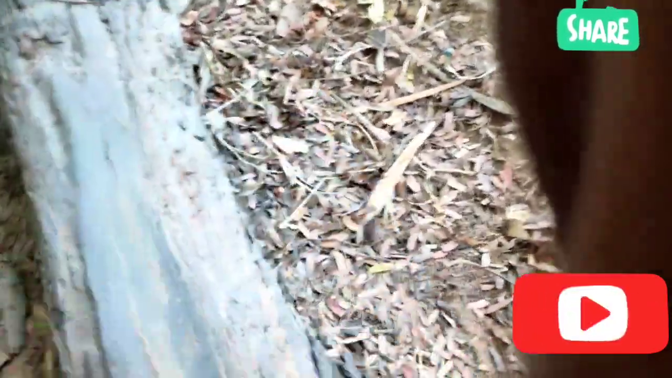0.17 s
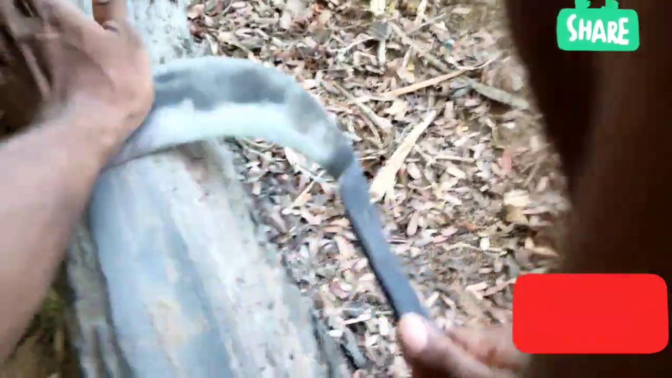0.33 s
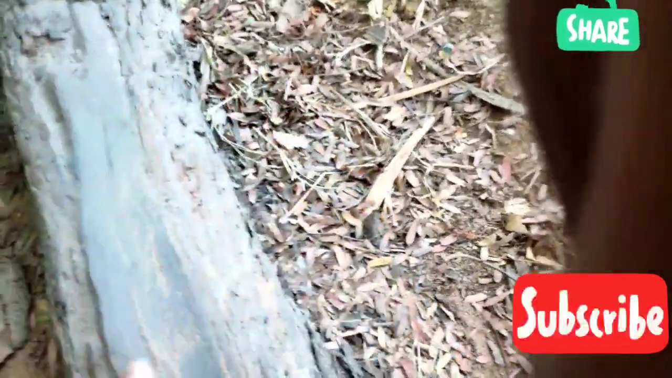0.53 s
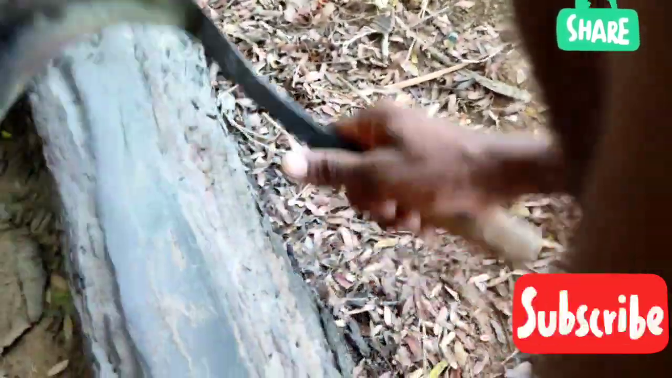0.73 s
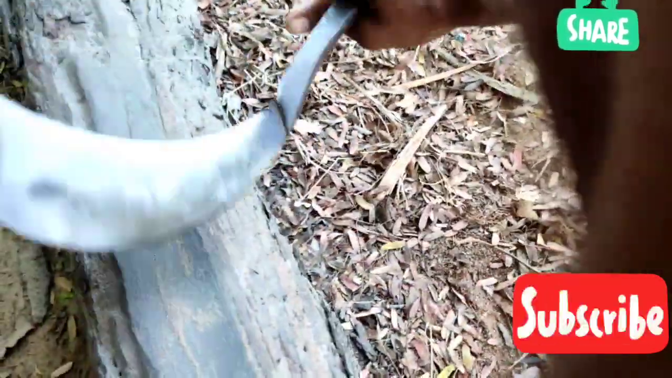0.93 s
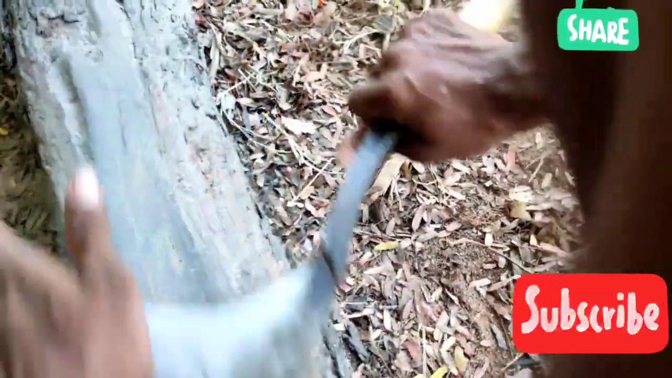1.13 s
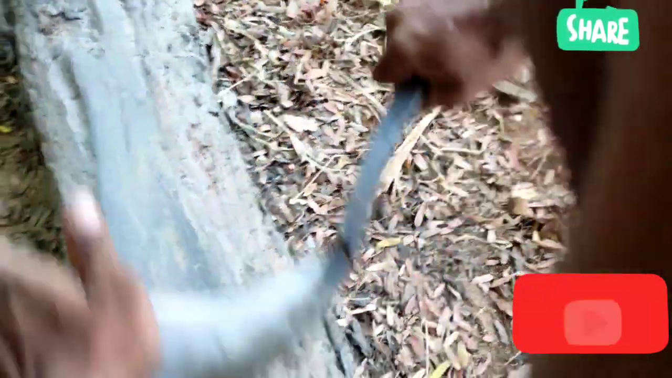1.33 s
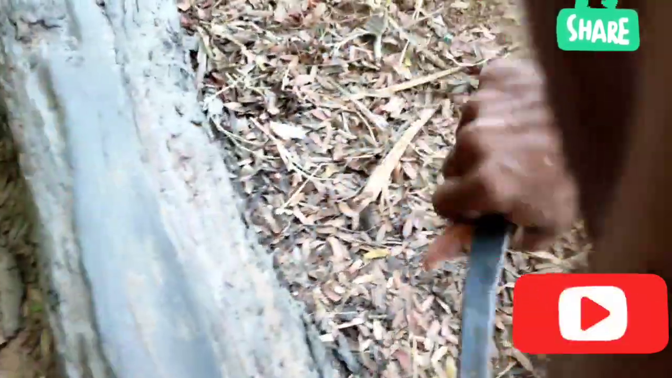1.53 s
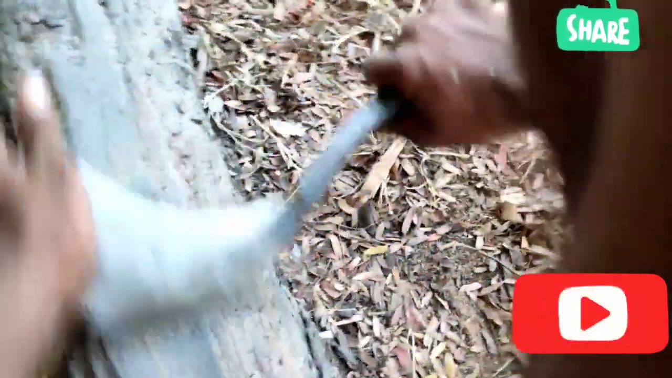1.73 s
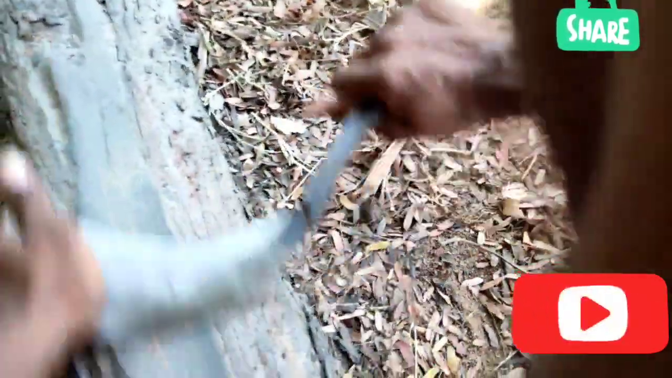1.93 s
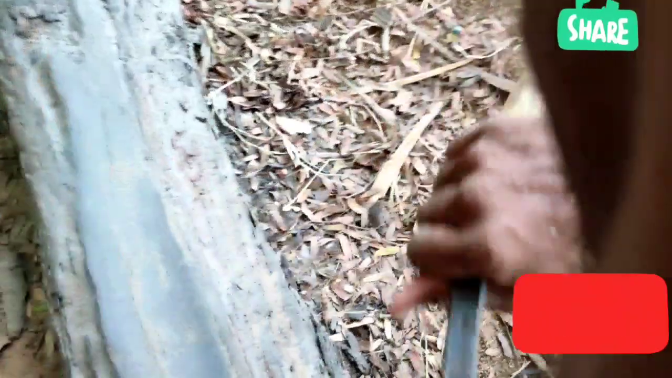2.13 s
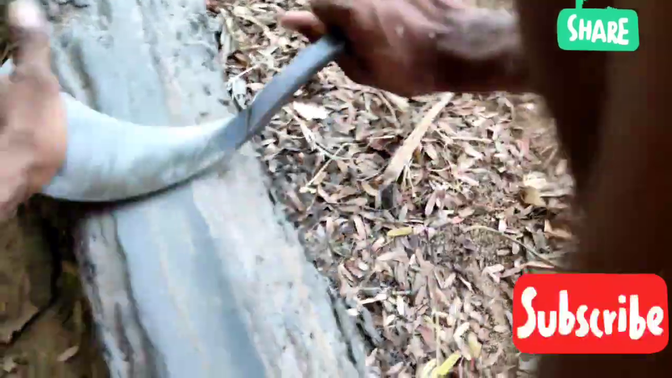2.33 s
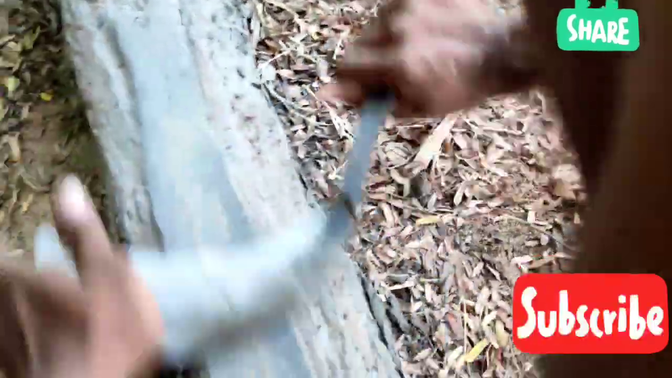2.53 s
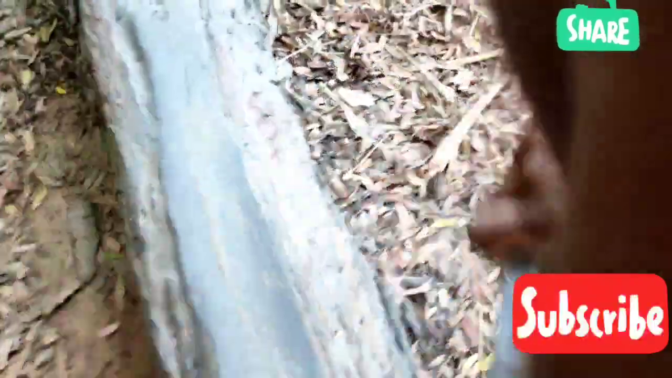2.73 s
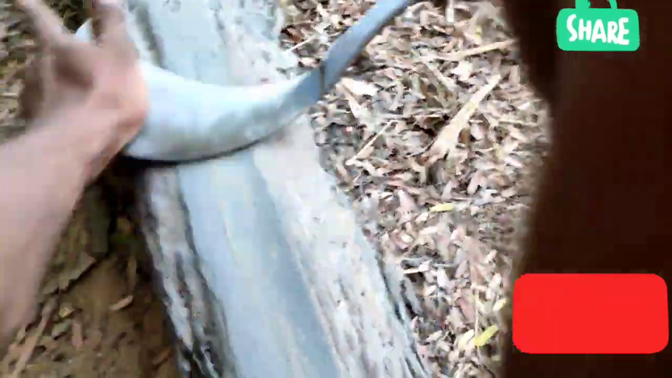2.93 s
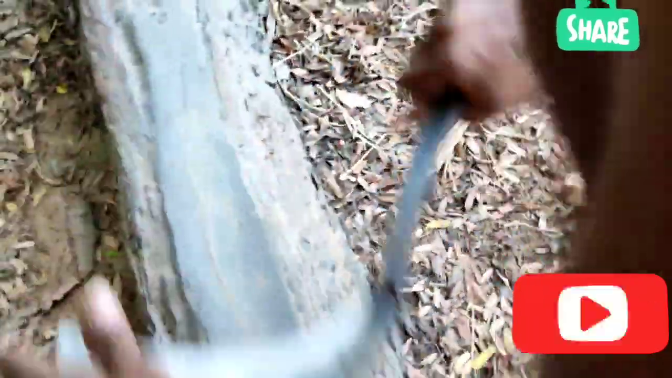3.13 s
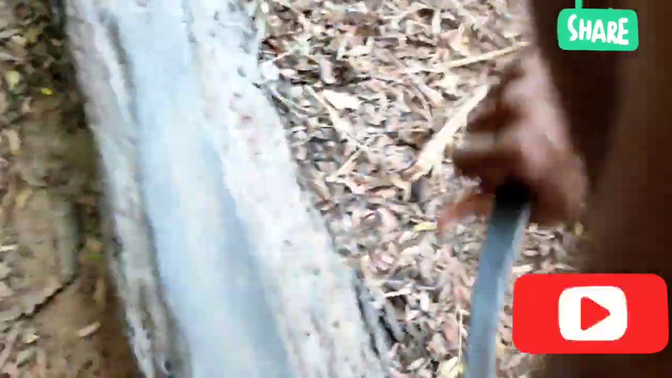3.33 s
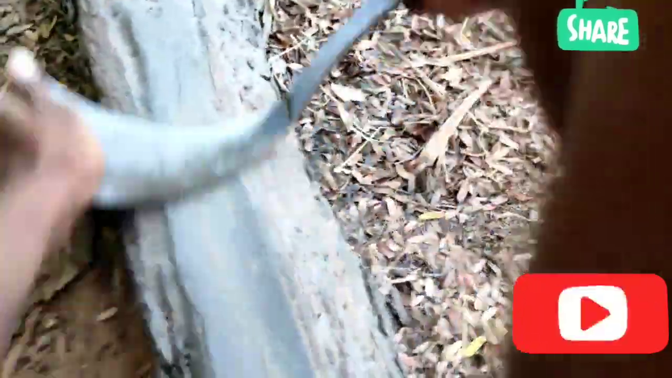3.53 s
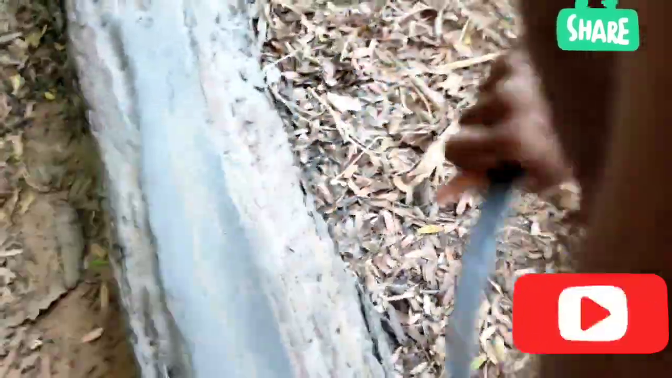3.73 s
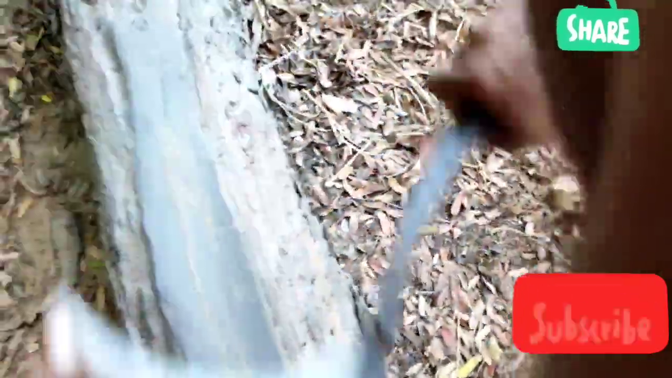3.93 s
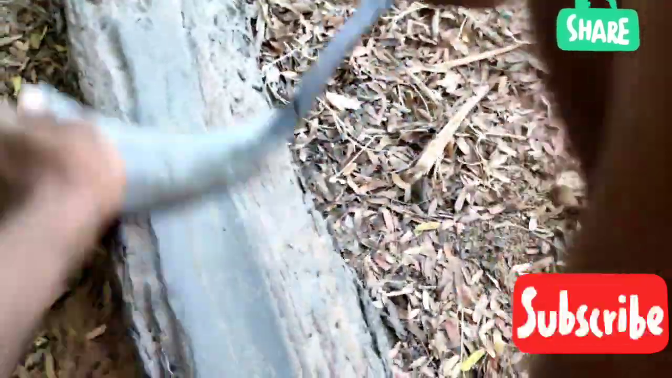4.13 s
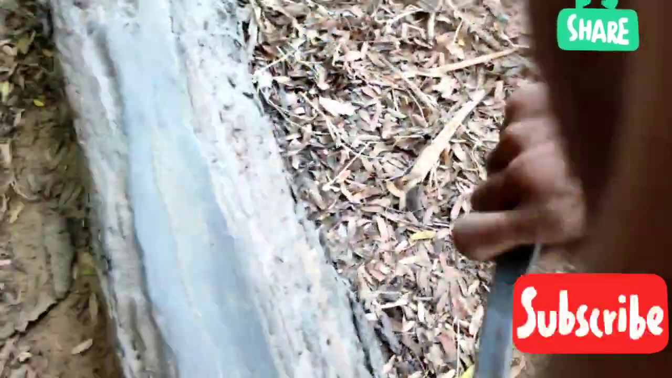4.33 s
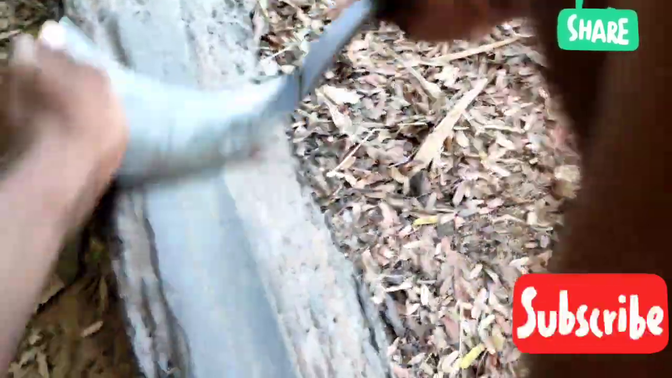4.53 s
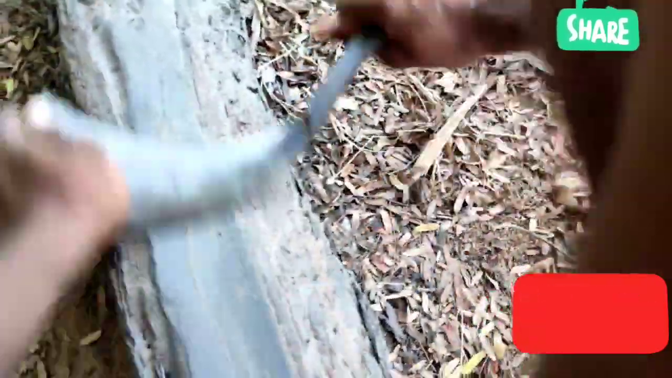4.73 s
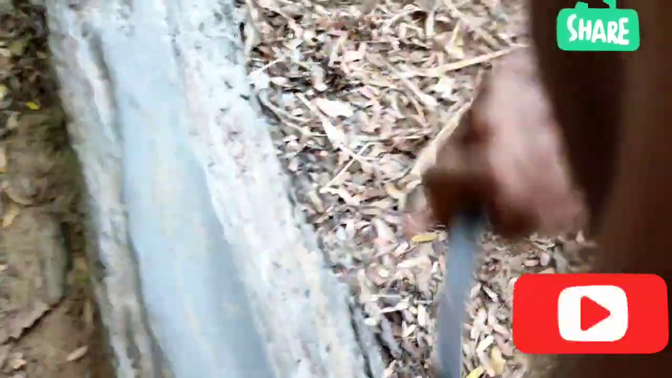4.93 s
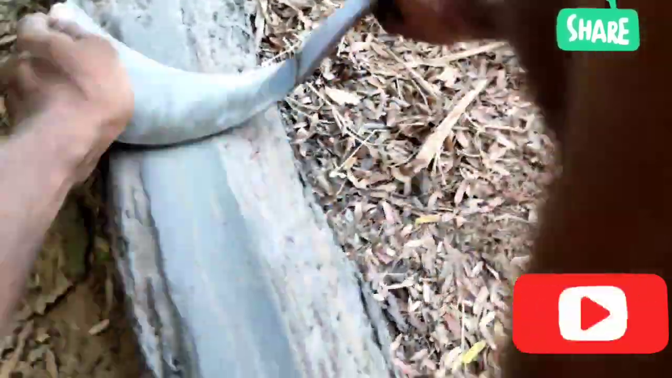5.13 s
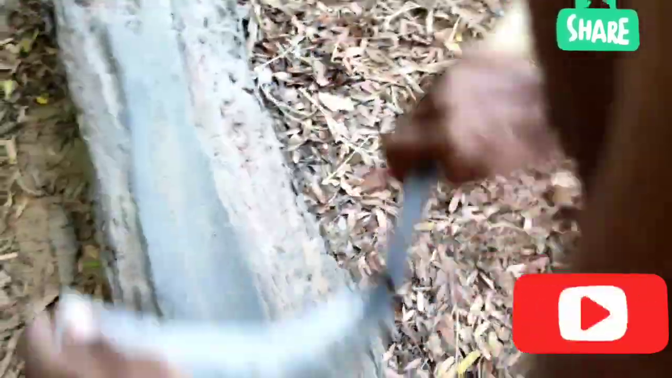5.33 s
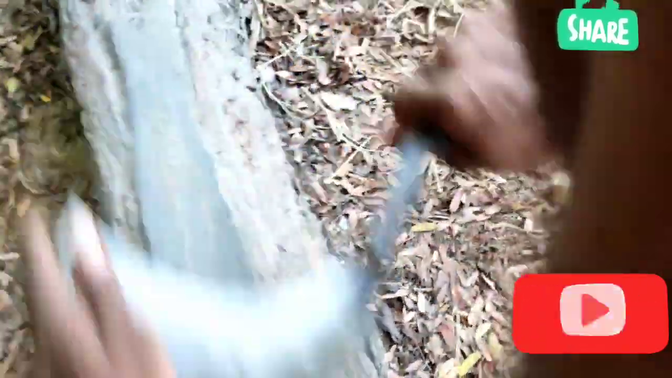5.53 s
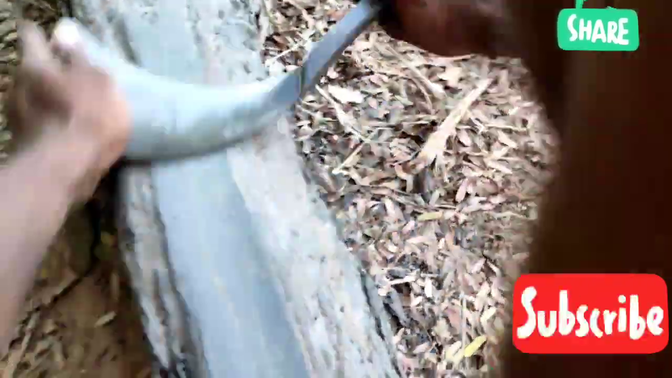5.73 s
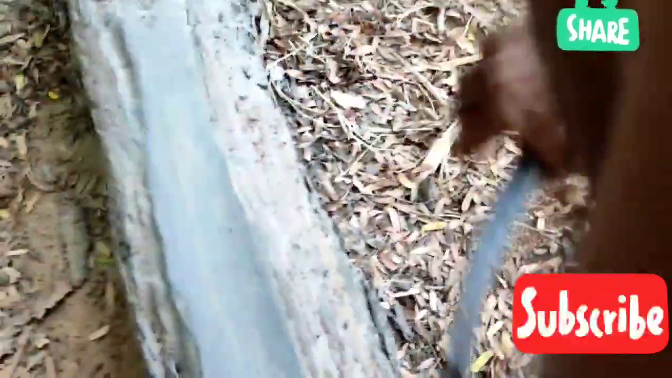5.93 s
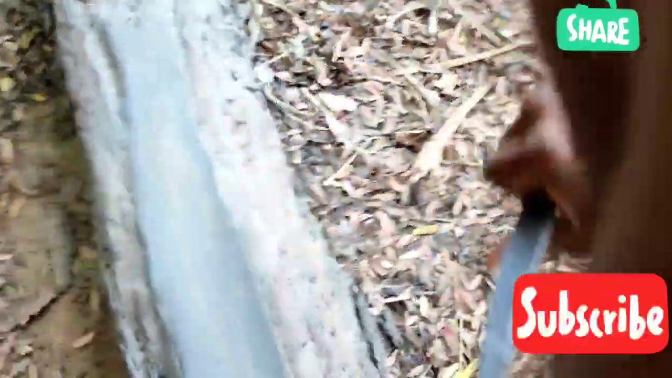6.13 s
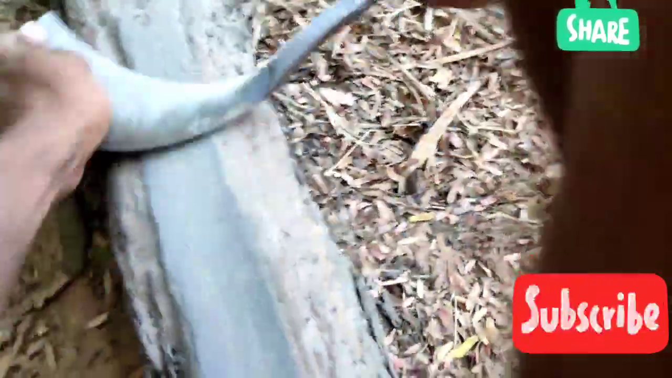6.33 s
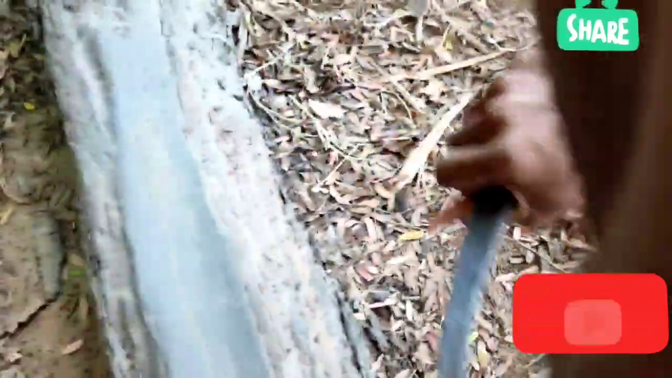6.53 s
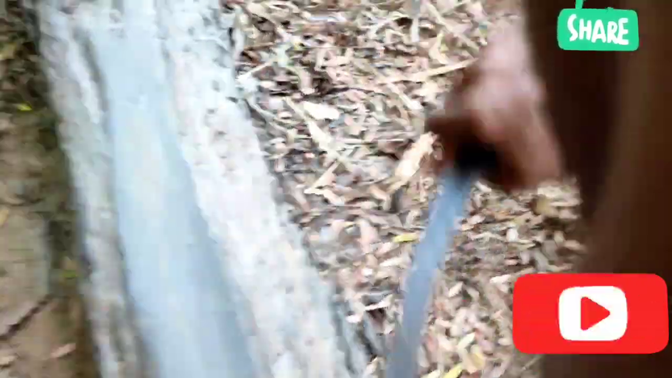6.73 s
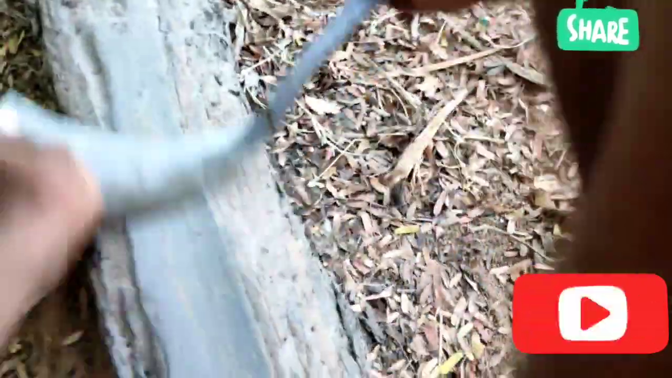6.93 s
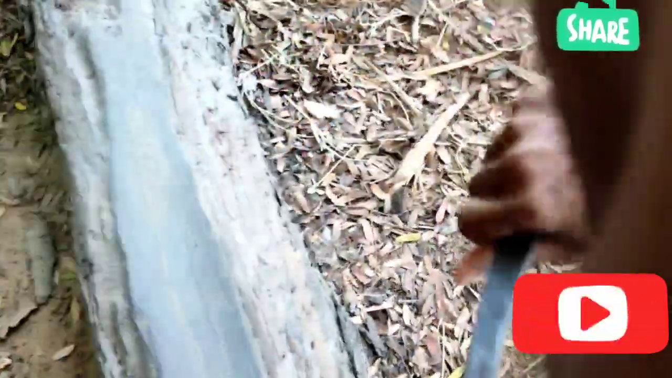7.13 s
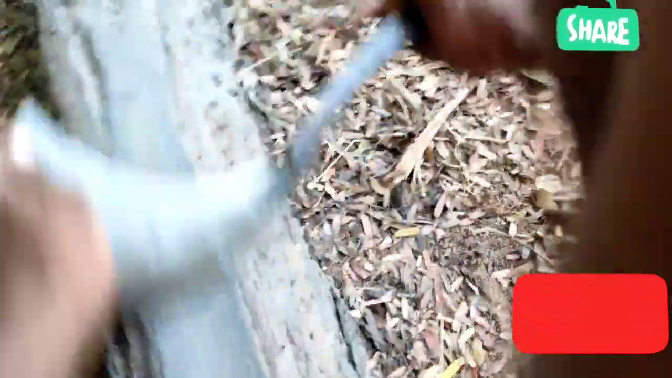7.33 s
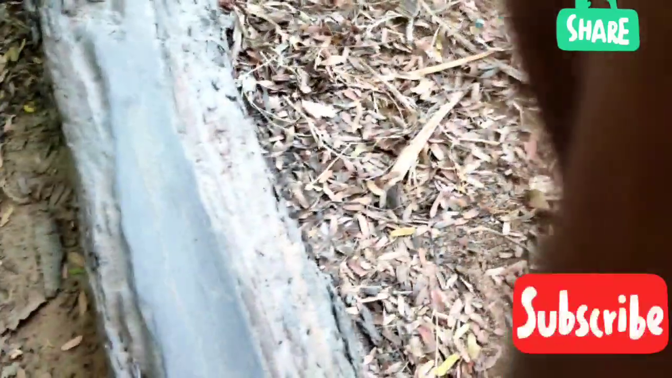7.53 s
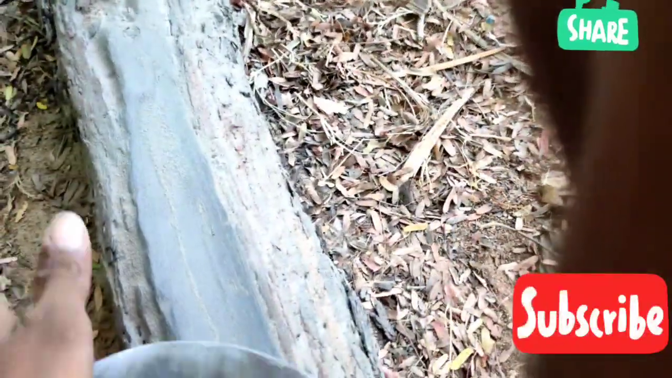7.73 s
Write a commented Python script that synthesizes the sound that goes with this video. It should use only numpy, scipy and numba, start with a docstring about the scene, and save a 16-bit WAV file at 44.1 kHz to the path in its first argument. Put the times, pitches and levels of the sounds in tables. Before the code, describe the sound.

A curved steel blade is scraped by hand over grit on a log, very close to a stereo microphone outdoors. From 0 to 0.7 s come several quick, fairly dull rasping strokes, each about 0.15 s long. At 0.73 s a sharp metallic knock marks the lift; a soft airy swish follows from 0.8 to 1.1 s, ending in two small clacks as the blade is set down around 1.07 s. From 1.1 s the rubbing resumes on the other face, brighter and harsher, at about six and a half strokes a second, with gritty crunch, short damped steel resonances and alternating tone. Low wind rumble grows after 2.7 s, with puffs and thumps mostly on the left, strong near 3.3, 3.8 and 7.3 s. The last stroke fades by 7.54 s; a faint swish follows around 7.7 s over wind and slight hiss.

```python
"""Outdoors, beside a log: a curved steel blade is rubbed to and fro over grit, close to a two-port microphone.
Irregular grain bites excite damped modes of the blade, while crushed grit and the log sound directly.
The blade is lifted, swung round and set down with knocks, then rubbed again and lifted at the end; the swings
are bands of air noise. Wind turbulence buffets each port separately over a faint, steady hiss of shaped noise."""
import sys
import numpy as np
from scipy import signal
from scipy.fft import rfft, irfft, next_fast_len
from scipy.io import wavfile
from scipy.ndimage import uniform_filter1d
from numba import njit

SR = 44100
rng = np.random.default_rng(int(sys.argv[2]) if len(sys.argv) > 2 else 0)


def inscribe(sig):
    """Save sig as 16-bit PCM at rate SR to the path in sys.argv[1].

    A 1-D sig is mono; a 2-D sig holds one channel per row.
    Samples are clipped to [-1, 1] before scaling.
    """
    pcm = np.round(np.clip(np.atleast_2d(sig).T, -1, 1) * 32767)
    wavfile.write(sys.argv[1], SR, pcm.astype(np.int16))


N = 342657
STEP = 32  # samples between control values
T = np.arange(N // STEP + 1) * STEP / SR  # control times, s

# Spectrum of the outdoor hiss: frequency_hz, relative_density_db
HISS_SPECTRUM = [(200, -23), (600, 1.5), (2000, -12), (6000, -19), (9000, -11.5), (14000, -24)]
HISS_DB = -51  # rms level
# Wind at the ports: time_s, relative_level_db, left_minus_right_db
WIND_LEVELS = [(0.0, -54, 7), (0.6, -48.0, -3), (1.2, -41.5, -3.5), (1.8, -46.5, 9), (2.3, -42, -3),
               (2.7, -39.5, -11), (3.1, -28.5, 7.0), (3.5, -26.5, 15), (3.9, -31, 7), (4.3, -32, 7),
               (4.8, -33.0, 6), (5.3, -30.5, 1), (5.9, -34.5, 11), (6.4, -28.5, 10), (6.9, -32.5, 5.5),
               (7.3, -27.5, 6.5), (7.77, -27, 0)]
# Spectrum of wind turbulence: frequency_hz, relative_density_db
WIND_SPECTRUM = [(15, -41), (25, -1.5), (70, 0.5), (98, 1.5), (249, -4.5), (364, -11), (545, -20.5),
                 (700, -35), (910, -28), (1540, -120)]
# Strongest puffs: time_s, peak_db, width_ms (between the points 6 dB down), port (0 left, 1 right)
GUSTS = [(1.84, -28, 99, 0), (2.36, -25.5, 170, 0), (2.75, -18, 56, 1), (3.06, -22, 89, 1),
         (3.28, -14.5, 93, 0), (3.43, -19, 64, 1), (3.64, -22, 72.0, 1), (3.76, -18, 38, 1),
         (3.82, -14.5, 75, 0), (3.98, -18.5, 85, 1), (4.06, -17.5, 78, 0), (4.31, -20, 77, 0),
         (4.32, -27.0, 96, 1), (4.83, -20, 120, 0), (5.71, -20, 51, 1), (6.37, -25, 56.0, 0),
         (6.91, -20.5, 49, 0), (7.12, -18.5, 62, 1), (7.32, -11.5, 42, 0), (7.66, -17.5, 35, 1)]
PUFF_DB, PUFFS_PER_S = (4, 5.5), 13  # spread at the left and right port; rate of new puff levels
# Blade and arm swept through the air: time_s, level_db, centre_hz
SWISHES = [(0.768, -85, 890), (0.81, -34, 960), (0.862, -42.5, 1900), (0.92, -42, 1960), (1.0, -44.5, 1750),
           (1.07, -46, 1500), (1.1, -44, 1520), (7.58, -95, 2110), (7.64, -50, 2200), (7.68, -45.5, 2220),
           (7.77, -51, 2280)]
# Blade knocks on the log: time_s, relative_level_db, contact_ms, ring_share (0-1)
KNOCKS = [(0.73, -10, 0.015, 0.89), (1.07, -21.5, 0.14, 0.51), (1.088, -12, 0.022, 0.89)]
# Blade off the log, first coming down again on its other face: start_s, end_s
LIFTS = [(0.774, 1.1), (7.54, 7.8)]
# Rubbing strokes: start_s, turn_db, attack_ms, early_db (once moving), slack_db (drop at mid-stroke),
# late_db (before slowing), release_ms, brightness_db (treble against bass)
STROKES = [(-0.07, -51, 112, -6.5, 11, -15, 54, -2.5), (0.096, -40, 87, -13, 5, -16, 43, -12),
           (0.254, -45, 48, -18.5, -5, -13.5, 50, -8), (0.425, -41, 43, -17.5, 0.0, -15, 33, -9.5),
           (0.572, -51, 88, -11, 3, -22, 67, -5), (1.121, -36.5, 115, -12, -4, -10.5, 52, 4.5),
           (1.306, -48, 46, -9, -2.5, -13, 38, -1.5), (1.458, -37, 52, -9.5, 2.5, -9.5, 53, 5),
           (1.605, -44, 37, -11.5, 1.5, -11.5, 47, 2), (1.758, -45, 62, -7.5, -1, -12, 45.5, 3),
           (1.9, -44.5, 45, -9, 6.5, -9, 53, 1.0), (2.057, -41.5, 67.0, -10, 5.5, -10, 59, 4.5),
           (2.218, -46, 26, -16, -3, -12.5, 58, 2.5), (2.376, -38.5, 51, -11, 3.5, -13, 38, 6),
           (2.527, -51, 65, -9.5, 2, -10, 78, 3), (2.684, -31.5, 67, -13.5, 10.5, -10.5, 80, 3),
           (2.851, -33.5, 45, -14, -4, -14, 52, 5.5), (3.004, -31.5, 59, -11, 3.0, -13, 94, 4.5),
           (3.157, -44, 71, -11, 0.0, -14, 51.0, 6.5), (3.306, -35, 33, -10.0, 5.5, -11.5, 59, 7),
           (3.457, -47, 75.0, -12.5, 0.0, -14.5, 47.0, 8), (3.629, -34.0, 48, -10, 8.5, -11.5, 63.0, 6.5),
           (3.78, -47, 44, -14, -1.5, -11.5, 64, 4), (3.936, -33.5, 34, -12.5, 5.0, -12, 60, 8.5),
           (4.087, -53, 60, -14.5, -2.5, -13.5, 53, 7.5), (4.243, -25, 68, -9.5, -1, -16.5, 59.0, 5.5),
           (4.398, -51.5, 79, -10, 4, -12.5, 66, 4.5), (4.571, -31, 42, -10.5, -1, -14.5, 56, 7),
           (4.712, -50, 88, -9.5, 5, -6.5, 49, 3), (4.873, -32, 61, -7, 4, -11, 54, 5),
           (5.024, -50.5, 74, -9, 1.5, -10.5, 45, 2.5), (5.178, -32, 58, -8, 9.0, -14, 57, 2),
           (5.333, -47, 51, -12.5, 0.0, -10.5, 32, 4.5), (5.492, -34.5, 58, -9, 3, -14, 48, 5.5),
           (5.643, -49, 56, -13, 2, -10, 40, 2), (5.8, -35.5, 52, -10.5, 5.5, -13, 47, 3.5),
           (5.958, -48, 49, -10.5, 4.0, -16.5, 21, 4), (6.119, -40, 31, -6.5, 5.5, -13.5, 63, 6.5),
           (6.269, -38, 70, -11, 4.5, -8.5, 37, 8), (6.423, -33, 43.0, -11.5, 7.5, -12, 55.0, 5.5),
           (6.571, -51, 53, -12.5, 2, -11, 38, 7.5), (6.731, -30.0, 41, -9.5, 11, -16, 47.0, 5.5),
           (6.888, -51, 57, -10, 7, -9, 46, 6.5), (7.034, -29, 58, -6.5, 11.5, -10.5, 58, 3),
           (7.192, -52, 69, -10.5, 3.5, -10, 37, 5.5), (7.346, -34.0, 58, -10.5, 8, -14.5, 120, 10)]
LIFTED_DB = -63.5  # level as the edge leaves the log
# First face, second face: treble lost at both turns; treble change from the near to the far end (the first face
# grows duller, the second brighter)
ARCH_DB, FAR_BRIGHT_DB = (12, 13.5), (-11, 11)
# Crushed grit, coarse to fine: centre_hz, relative_level_db
GRIT_SIZES = [(500, -61), (1000, -45), (2000, -23), (3500, -17.5), (6000, -16.5), (9000, -57), (12500, -32)]
# Blade modes: frequency_hz, width_hz (pressed down), left_db, right_db (both relative),
# far_db (gained from the near to the far end), face_db (weight of the change on the first face)
BLADE_MODES = [(806, 51, -42, -13, 1, 7), (1226, 90, -8.5, -5, 9, 6.5), (1470, 43, -8.5, -4, -7.5, -4),
               (1900, 150, -3.5, -18, -3, -4), (2350, 133, -9, -6.5, -9, -0.5),
               (2610, 152, -2, -9, 5.5, -14), (2972, 156, -3, -10.5, 16, -9),
               (3286, 180, 1.5, -3.5, 4, -25), (3580, 236, -12.5, -15.5, 8, 18.5),
               (4273, 206, -9, -6, -10, 7.5), (4675, 210, -5, -2.5, -3.5, -6),
               (5100, 22, -21, -4, -3.5, 19.5), (5550, 340, -22.5, -5, 7, -6),
               (6190, 410, -16, -5.5, 3, -13), (6730, 168, -9.5, -4, -3, 13),
               (7116, 124, -23, 1.5, -2, -10), (8370, 330, -11.5, -36, 27.5, 8.5),
               (9580, 58, -9.5, -26.5, 4, -16), (11100, 360, -19, -19, -7, -6)]
PORT_LAG_MS, LAG_SWING_MS = 0.3226, 0.068  # mean delay of the left port and its random spread
TOP_HZ = 15100  # stop-band edge of the microphone


def undb(db):
    """Level law: an amplitude ratio is ten to the power of decibels over twenty."""
    return 10 ** (np.asarray(db) / 20)


def gain(db):
    """Amplitude modulation: control-rate decibels become a gain for every sample."""
    return np.interp(np.arange(N), np.arange(len(T)) * STEP, undb(db))


def unit(x):
    """Power normalisation: scale to rms 1."""
    return x / np.sqrt(np.mean(x ** 2))


def walk(rate):
    """Low-pass random process: levels held for 1 / rate seconds, slewed twice, with spread near 1."""
    k = max(int(SR / STEP / rate), 1)
    held = np.repeat(rng.standard_normal(len(T) // k + 1), k)
    return 1.467 * uniform_filter1d(uniform_filter1d(held, k), k)[:len(T)]


def colour(x, hz, db):
    """Spectral shaping: weight a noise by a curve drawn on a log-frequency axis."""
    n = next_fast_len(N + SR // 2)
    f = np.maximum(np.fft.rfftfreq(n, 1 / SR), 1)
    curve_db = np.interp(np.log(f), np.log(hz), db)
    return irfft(rfft(x, n) * undb(curve_db), n)[:N]


@njit
def resonate(x, g, k, scale):
    """State-variable band-pass: two integrators whose tuning g and damping k change every 32 samples."""
    y, band, low = np.empty(len(x)), 0., 0.
    for i in range(len(x)):
        j = i >> 5
        v = (band + g[j] * (x[i] - low)) / (1 + g[j] * (g[j] + k[j]))
        band = 2 * v - band
        low = low + 2 * g[j] * v
        y[i] = scale * v
    return y


def resonance(x, hz, width, damping=1):
    """Damped resonance: gain near 1 at full damping; less damping lets it ring on."""
    hz = hz + 0 * T
    return resonate(x, np.tan(np.pi * hz / SR), damping * width / hz, width / hz.mean())


def twice(x, hz, width):
    """Cascaded resonance: two equal band-passes give steeper skirts."""
    return resonance(resonance(x, hz, width), hz, width)


def outdoors():
    """Diffuse field: a faint steady hiss, partly common to both ports."""
    mid = rng.standard_normal(N)
    ports = []
    for _ in range(2):
        hiss = colour(0.58 * mid + rng.standard_normal(N), *np.transpose(HISS_SPECTRUM))
        ports.append(undb(HISS_DB) * unit(hiss))
    return np.array(ports)


def wind():
    """Local turbulence: uneven eddies press and pop on each port alone, in quick lumps and slower puffs."""
    s, db, pan_db = np.transpose(WIND_LEVELS)
    spectrum = np.transpose(WIND_SPECTRUM)
    out = []
    for port, sign in enumerate((-1, 1)):
        pop_db = np.minimum(2.9 * rng.exponential(size=N), 11)
        pops = sign * (rng.random(N) < 90 / SR) * undb(pop_db)  # 90 a second on average
        lumps = rng.standard_normal(N) * gain(4.4 * walk(60) + 0.85 * walk(9.4))
        turbulence = unit(colour(lumps, *spectrum)) + .5 * unit(colour(pops, *spectrum))
        port_db = np.interp(T, s, db - sign * pan_db / 2) + PUFF_DB[port] * walk(PUFFS_PER_S)
        for at, peak_db, width_ms, side in GUSTS:
            if round(side) == port:
                port_db = np.maximum(port_db, peak_db - 6 * ((T - at) / (width_ms / 2000)) ** 2)
        out.append(turbulence * gain(port_db) / np.sqrt(2))
    return np.array(out)


def swish():
    """Aerodynamic noise: bands of turbulence round the swung blade move in level and pitch."""
    s, db, hz = np.transpose(SWISHES)
    air = rng.standard_normal((3, N))  # one part common to the ports, one for each
    centre = np.interp(T, s, hz)
    band = [unit(twice(air[0] + 1.06 * air[c], centre, 1700)) for c in (1, 2)]
    return np.array(band) * gain(np.interp(T, s, db) + 1.1 * walk(40))


def knocks():
    """Impulsive excitation: each contact push divides between ringing the blade and thudding in the log."""
    ring, thud = np.zeros(N), np.zeros(N)
    n = int(0.037 * SR)
    t = np.arange(n) / SR
    for s, db, contact_ms, share in KNOCKS:
        i = int(s * SR)
        push = np.exp(-(t / (contact_ms / 1000)) ** 2)
        # grains settle under the edge in a decaying rattle
        push += 0.53 * rng.standard_normal(n) * np.exp(-t / 0.0094) * share
        ring[i:i + n] += share * undb(db) * push
        thud[i:i + n] += (1 - share) * undb(db) * push
    return ring, thud


def strokes():
    """Reciprocating friction: each stroke swells, may slacken midway, and fades into the next turn."""
    travel, db, bright_db = np.zeros(len(T)), np.full(len(T), -85.), np.zeros(len(T))
    far = 1.  # starting end of the stroke: 1 far, 0 near
    turns = [row[:2] for row in STROKES[1:]] + [(np.inf, 0)]
    for row, (stop, end_db) in zip(STROKES, turns):
        s, turn_db, attack_ms, early_db, slack_db, late_db, release_ms, tone_db = row
        lift = min(a for a, b in LIFTS if a > s)
        lifts, face = lift < stop, int(s > LIFTS[0][0])
        if lifts:
            stop, end_db = lift, LIFTED_DB
        now = (T >= s) & (T < stop)
        ms, length = 1000 * (T[now] - s), 1000 * (stop - s)
        rise = np.clip(1 - ms / attack_ms, 0, 1) ** 2
        fall = np.clip(1 - (length - ms) / release_ms, 0, 1) ** 2
        hold = np.clip((ms - attack_ms) / max(length - attack_ms - release_ms, 1), 0, 1)
        body = early_db + (late_db - early_db) * hold - slack_db * np.sin(np.pi * hold) ** 2
        db[now] = body + (turn_db - early_db) * rise + (end_db - late_db) * fall
        travel[now] = far + (1 - 2 * far) * ms / length
        arch_db = ARCH_DB[face] * (2 * ms / length - 1) ** 2
        bright_db[now] = tone_db - arch_db + FAR_BRIGHT_DB[face] * (travel[now] - .5)
        far = far if lifts else 1 - far
    return travel, db, bright_db


def grit(spread_db, chatter_db):
    """Stochastic friction: dense bites of uneven size come in bunches as the edge judders."""
    bites = rng.standard_normal(N) * undb(spread_db * rng.exponential(size=N))
    return unit(bites * gain(chatter_db * walk(170)))


def tilt(bright_db, hz):
    """Spectral tilt: brightness raises bands above 4100 Hz and lowers those below by half its value."""
    return bright_db * np.tanh((hz - 4100) / 700) / 2


def arrivals(*sources):
    """Path difference: sound reaches the right port first, and the left after a wandering lag."""
    lag = SR / 1000 * (PORT_LAG_MS + LAG_SWING_MS * walk(25))
    n = np.arange(N)
    late = n - np.interp(n, np.arange(len(T)) * STEP, lag)
    return [np.array([np.interp(late, n, x), x]) for x in sources]


def blade_modes(motion, shared, patches, ring):
    """Modal excitation: blade modes swell and fade as the contact point slides along the edge."""
    travel, db, bright_db = motion
    # pressing on the log damps the steel; at low contact levels it rings longer
    damping = np.interp(db, [-55, -35], [.45, 1])
    first_face = T < LIFTS[0][1] - .07
    # on the first face the colour changes most just after the far turn
    tip = first_face * (0.35 + np.interp(T - 0.04, T, travel) ** 2)
    out = np.zeros((2, N))
    for hz, width, left_db, right_db, far_db, face_db in BLADE_MODES:
        centre = hz + 0.58 * width * walk(20)
        place_db = far_db * (travel - .5) + face_db * tip
        swell_db = db + tilt(bright_db, hz) + place_db + (4.0 - 2.0 * first_face) * walk(38)
        # low modes radiate alike to both ports, high ones from different patches of steel
        alike = np.clip(1.1 - hz / 9000, 0, 1)
        for c, port_db in enumerate((left_db, right_db)):
            bites = np.sqrt(alike) * shared[c] + np.sqrt(1 - alike) * patches[c]
            drive = bites * gain(swell_db + 1.99 * walk(25)) + undb(3.0) * ring[c]
            out[c] += undb(port_db + 5.5) * resonance(drive, centre, width, damping)
    return out


def crushed_grit(motion, shared, patches):
    """Direct fracture noise: grains of each size crush in their own clumps and frequency band."""
    _, db, bright_db = motion
    out = np.zeros((2, N))
    for c in range(2):
        for hz, size_db in GRIT_SIZES:
            grains = shared[c] + min(hz / 4000, 1) * patches[c]
            crush_db = db + size_db + 2.0 + tilt(bright_db, hz) + 1.8 * walk(35)
            out[c] += twice(grains * gain(crush_db), hz, 0.92 * hz)
    return out


def log_and_knocks(db, patches, ring, thud):
    """Forced resonance: rubbing and thuds drive the log; knocks add a woody band and a bright one."""
    out = np.zeros((2, N))
    for c in range(2):
        drive = gain(db) * patches[c] * undb(-18.5) + undb(24.5) * thud[c]
        out[c] += resonance(drive, 225, 220)
        out[c] += undb(27.5) * resonance(resonance(thud[c], 1080, 780), 1060, 790)
        out[c] += undb(8.5) * resonance(ring[c], 5800, 3300)
    return out


def blade():
    """Superposition: one contact force drives the blade modes, the crushed grit and the log."""
    motion = strokes()
    ring, thud = knocks()
    patches = [grit(1.7, 2.2), grit(3.48, 4.1)]  # bites heard at one port alone
    shared, ring, thud = arrivals(grit(2.3, 1.67), ring, thud)
    rubbing = blade_modes(motion, shared, patches, ring) + crushed_grit(motion, shared, patches)
    return rubbing + log_and_knocks(motion[1], patches, ring, thud)


def scene():
    """Linear superposition: all sources add at the two ports."""
    return outdoors() + wind() + swish() + blade()


def record(dry):
    """Band-limiting and saturation: thin deep bass, dull treble, rounded peaks and a steep top cut."""
    thin = signal.sosfilt(signal.butter(2, 36, "high", fs=SR, output="sos"), dry)
    dull = signal.sosfilt(signal.butter(2, 10500, fs=SR, output="sos"), thin)
    rounded = .8 * np.tanh(dull / .8)
    return signal.sosfilt(signal.cheby2(14, 70, TOP_HZ, fs=SR, output="sos"), rounded)


dry = scene()
out = record(dry)
inscribe(out)
```